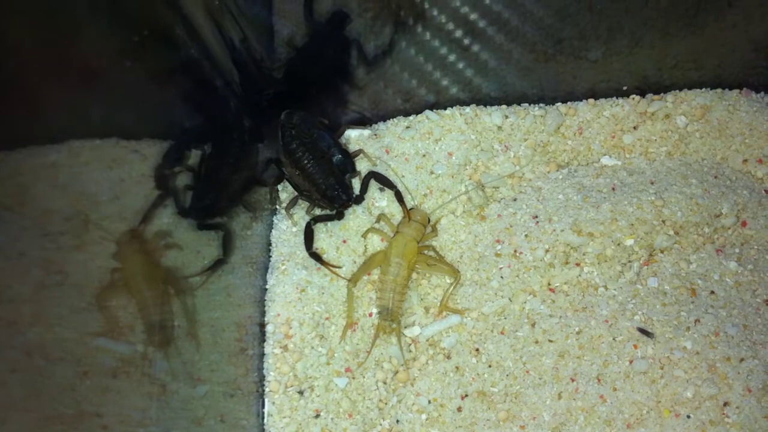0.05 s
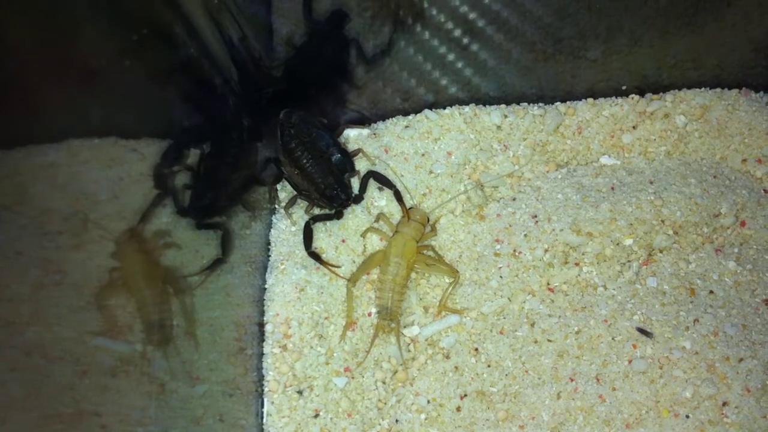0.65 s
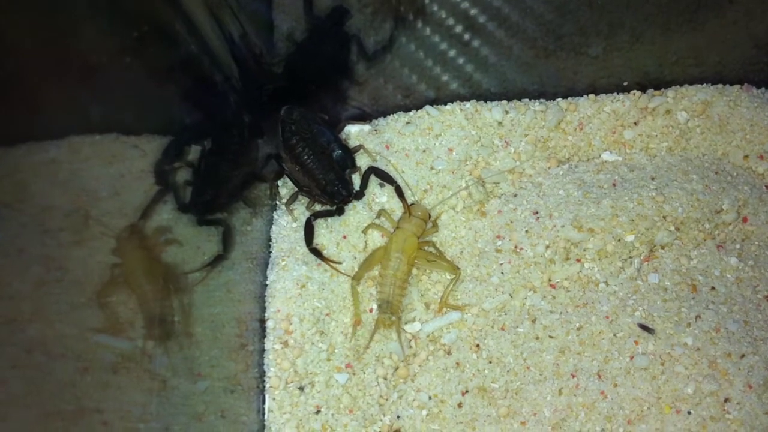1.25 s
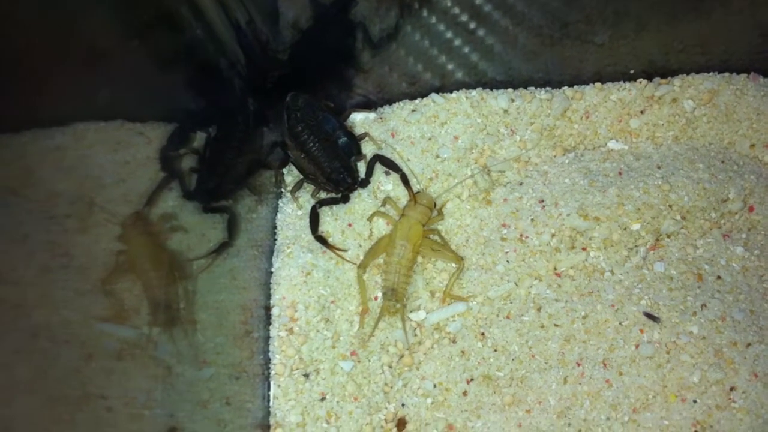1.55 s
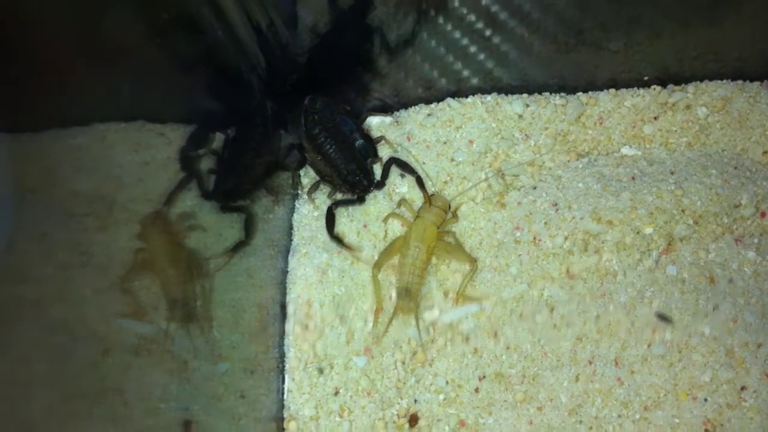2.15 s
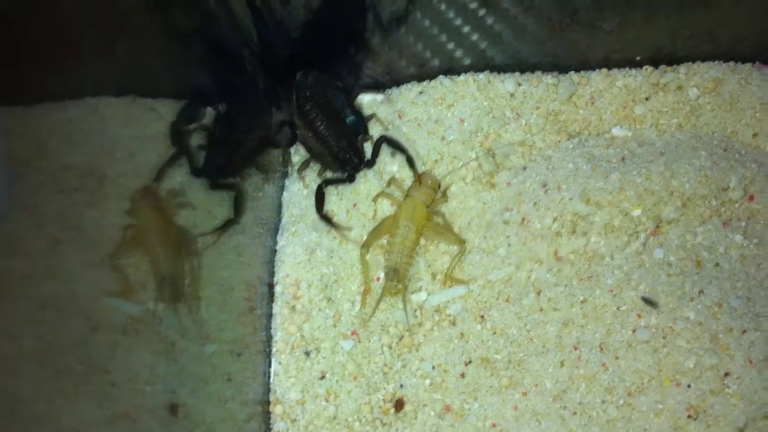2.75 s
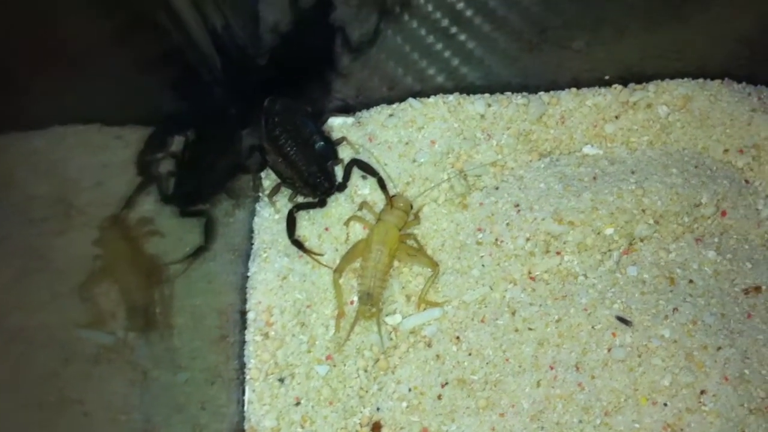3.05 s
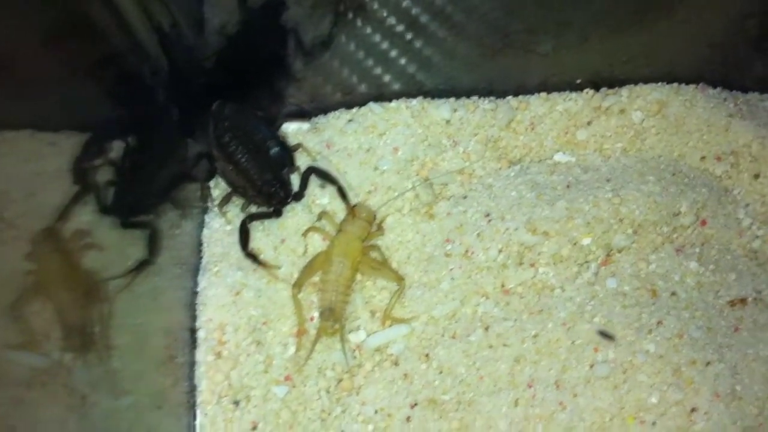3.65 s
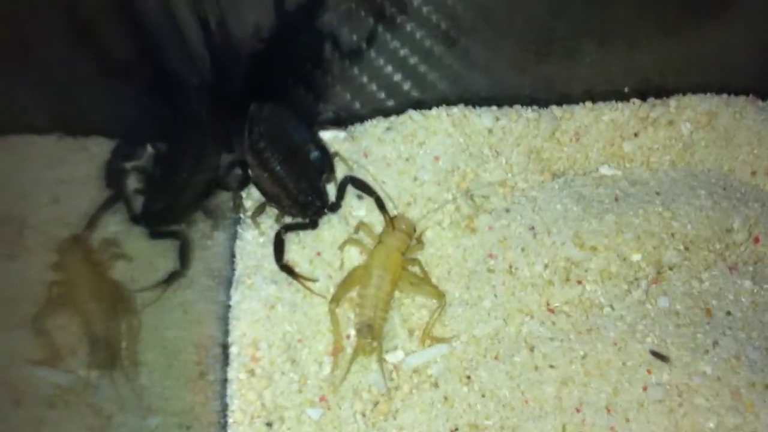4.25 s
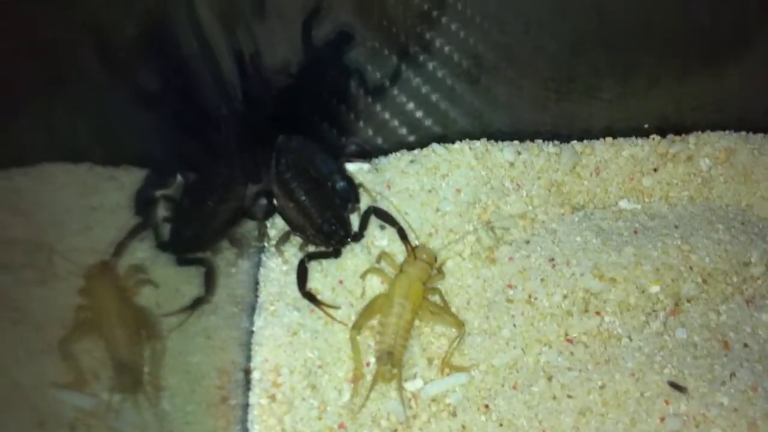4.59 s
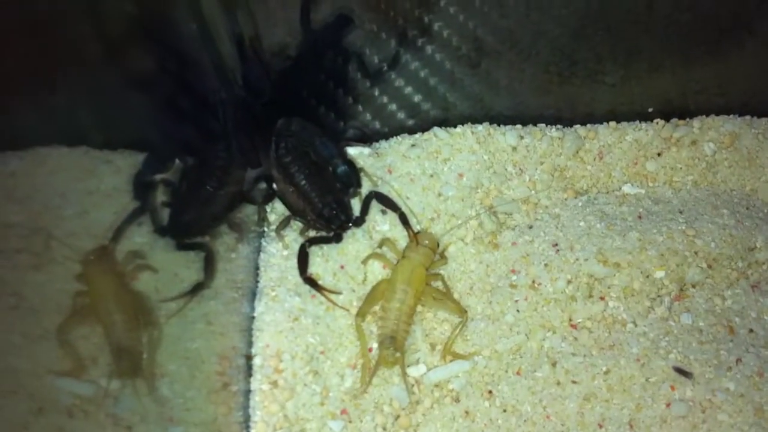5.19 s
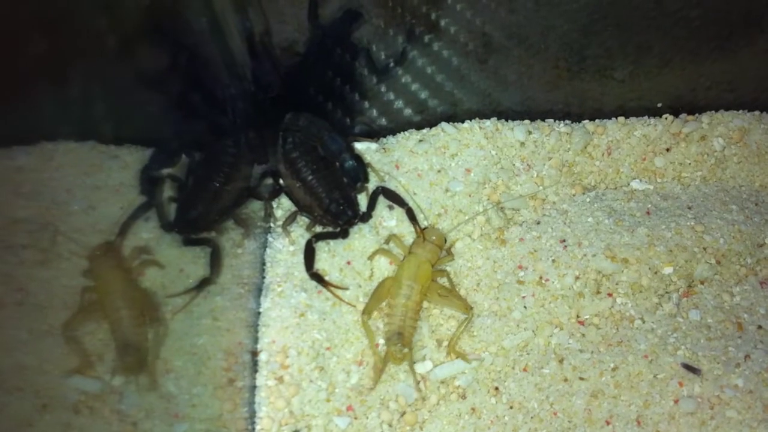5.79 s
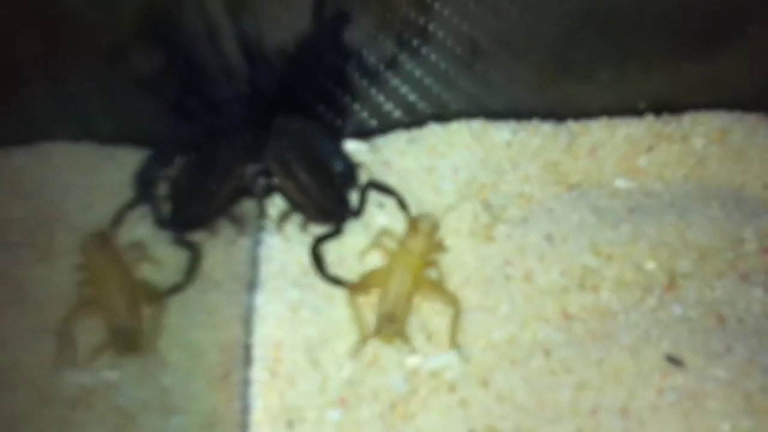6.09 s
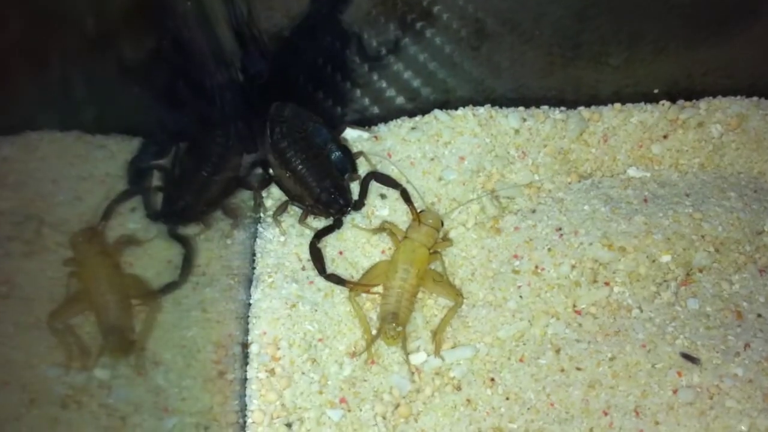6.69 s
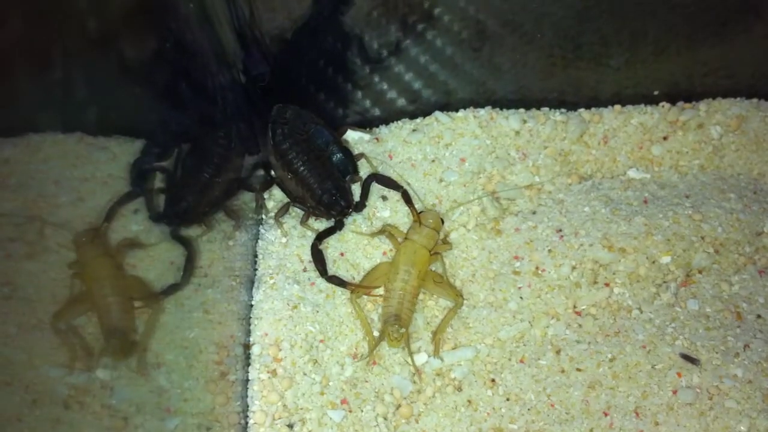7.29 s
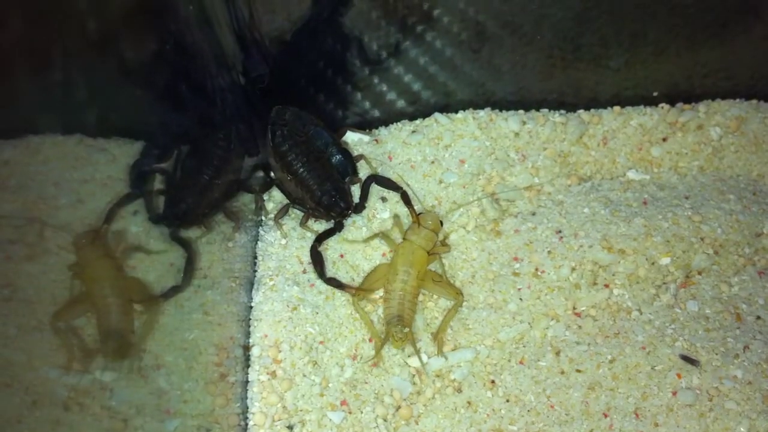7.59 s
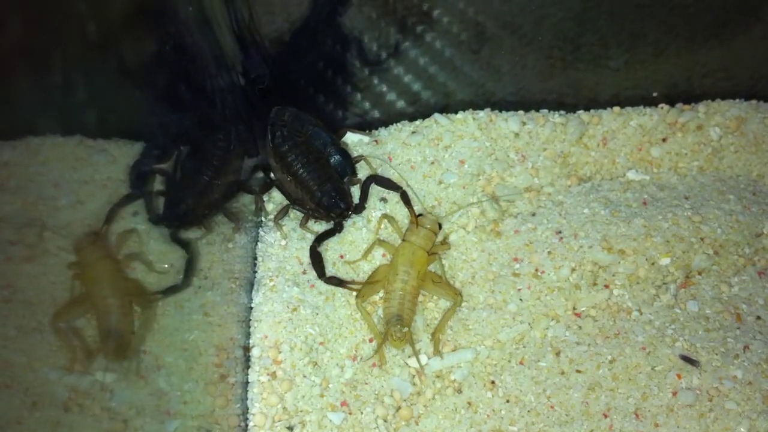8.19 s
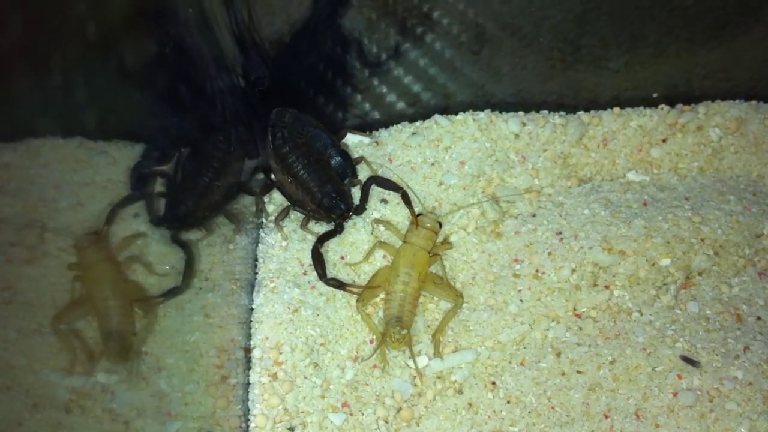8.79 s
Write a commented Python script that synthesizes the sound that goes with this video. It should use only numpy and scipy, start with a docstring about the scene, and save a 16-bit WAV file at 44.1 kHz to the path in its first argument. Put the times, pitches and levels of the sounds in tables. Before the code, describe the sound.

A hand-held camera's case clicks, thuds softly and snaps once loudly over quiet ventilation hum and hiss.

```python
"""A hand-held camera hovers over a glass animal tank in a quiet room. From the start, ventilation
rumbles and hums and the microphone hisses. The grip rubs and rustles, and a wall clock ticks faintly.
From about 1.5 s the camera's case clicks as its joints slip, and thuds as fingers push on it.
Near 6 s one snap is much louder than the rest. Then a distant motor takes up load and drones louder,
and at the end a low draught swells."""
import sys
import numpy as np
from scipy import signal
from scipy.fft import rfft, irfft
from scipy.io import wavfile

SR = 44100
rng = np.random.default_rng(int(sys.argv[2]) if len(sys.argv) > 2 else 0)


def store_pcm(level_fs):
    """Save levels as 16-bit WAV."""
    pcm = np.round(np.clip(level_fs, -1, 1) * 32767).astype(np.int16)
    wavfile.write(sys.argv[1], SR, np.atleast_2d(pcm).T)


N = 389844
TIME = np.arange(N) / SR
FREQUENCIES = np.fft.rfftfreq(N, 1 / SR)

# Each time a joint of the case lets go: start_s, body_db, contact_cutoff_hz, crack_db, crack_hz,
# snap_db, snap_hz, grit_db, build_up_s, die_out_s
CASE_CLICKS = [(1.5557, -48, 1500, -29, 2290, -44, 9000, -40.5, 0.0042, 0.0019),
               (1.6160, -23, 220, -29, 1920, -30, 8100, -49, 0.00054, 0.00068),
               (3.5795, -16.5, 400, -34, 900, -29, 6600, -48, 0.00053, .0005),
               (4.334, -60, 1500, -50, 3500, -44, 8000, -54, .0008, .0008),
               (4.3418, -45, 1730, -26, 1950, -31, 11000, -54, .0003, .0004),
               (4.3848, -41, 1200, -42, 1150, -42, 5000, -70, .0005, .003),
               (6.0900, -3, 2300, -27, 2100, -12, 7200, -44, 0.0004, 0.0057)]


def from_db(db):
    """Turn decibels into a number to multiply a sound by."""
    return 10 ** (np.asarray(db) / 20)


def rms_one(x):
    """Scale a sound so that its average strength (rms) is 1."""
    return x / np.sqrt(np.mean(x ** 2) + 1e-20)


def colour(spectrum):
    """Join rows of pitch_hz, level_db into a strength for every frequency."""
    hz, db = np.transpose(spectrum)
    return from_db(np.interp(np.log(FREQUENCIES + 1), np.log(hz), db))


def noise(gains):
    """Noise of strength 1, with its frequencies balanced by gains."""
    return rms_one(irfft(rfft(rng.standard_normal(N)) * gains, N))


def band_noise(hz, width_hz):
    """Noise gathered around one pitch."""
    return noise(1 / (1 + ((FREQUENCIES - hz) / width_hz) ** 2))


def ring(hz, fade_s, wave=np.sin):
    """The note of something struck: it dies away by 60 dB in fade_s."""
    t = TIME[:SR // 10]
    return wave(2 * np.pi * hz * t) * np.exp(-np.log(1000) * t / fade_s)


def low_pass(x, hz, order=1):
    """Dull a sound above hz; a higher order cuts more steeply."""
    return signal.sosfilt(signal.butter(order, hz, fs=SR, output="sos"), x)


def high_pass(x, hz):
    """Steeply cut what lies below hz."""
    return signal.sosfilt(signal.butter(4, hz, "high", fs=SR, output="sos"), x)


def swell(middle_s, half_length_s):
    """A smooth rise to 1 and fall again."""
    return np.exp(-((TIME - middle_s) / half_length_s) ** 2)


def add(out, start_s, sound):
    """Mix a short sound into out."""
    start = round(start_s * SR)
    out[start:start + len(sound)] += sound[:max(N - start, 0)]


def air(level_db=-56.5):
    """Room air rumbles and the microphone hisses, both steadily."""
    # Tone of the air and hiss: pitch_hz, relative_db
    spectrum = [(30, -27), (46, -37), (70, -14.5), (105, -18), (135, -1), (200, -0.5), (320, -6.5),
                (480, -4), (680, -14), (1000, -12), (2150, -13), (3100, -23.5), (5500, -28), (9000, -31.5),
                (16000, -32.5)]
    return from_db(level_db) * noise(colour(spectrum))


def draught(idle_db=-71.5, gust_db=-58):
    """A low draught blows softly, then swells once."""
    # Tone of the moving air: pitch_hz, relative_db
    spectrum = [(40, -37), (110, -14), (145, -1.5), (220, 6), (300, 1), (450, -2), (700, -17), (2000, -62)]
    gust = from_db(gust_db) * swell(middle_s=8.64, half_length_s=0.59)
    return (from_db(idle_db) + gust) * noise(colour(spectrum))


def fan_hum():
    """The fan hums several notes; each wavers, which blurs its pitch."""
    # The fan's notes: pitch_hz, level_db, width_hz
    notes = [(193.8, -72, 10), (286, -66, 8), (358.5, -68, 7), (727, -73, 4), (1792.5, -77.5, 4),
             (2149, -76, 3), (2864, -88, 3)]
    out = np.zeros(N)
    for hz, db, width_hz in notes:
        wander = np.cumsum(rng.standard_normal(N)) * np.sqrt(2 * np.pi * width_hz / SR)
        phase = 2 * np.pi * hz * TIME + low_pass(wander, hz=16)
        out += from_db(db) * np.sqrt(2) * np.sin(phase)
    return out


def motor_drone(pitch_hz=78.3, width_hz=13.0, idle_db=-81.5, loaded_db=-73, load_s=6.8, rise_s=0.24):
    """A distant motor throbs unevenly, and grows louder once it takes up load."""
    load = np.clip((TIME - load_s) / rise_s, 0, 1)
    drone = noise(np.exp(-((FREQUENCIES - pitch_hz) / width_hz) ** 2))
    return from_db(idle_db + load * (loaded_db - idle_db)) * drone


def scratches():
    """Light rubbing swells and fades around one pitch; the narrowest rubs squeak."""
    # Faint rubs: middle_s, level_db, half_length_s, pitch_hz, width_hz
    rubs = [(0.45, -75, 0.47, 3300, 200), (1.02, -73, .1, 2950, 200), (4.453, -62.5, 0.4, 488, 50.3),
            (5.448, -74, 0.11, 3680, 250), (7.784, -74, 0.083, 5000, 550), (8.606, -73, .010, 5000, 110),
            (8.636, -77, .012, 4980, 110)]
    return sum(from_db(db) * swell(middle_s, half_length_s) * band_noise(hz, width_hz)
               for middle_s, db, half_length_s, hz, width_hz in rubs)


def rustles(grains_per_s=6300, rise_s=0.0011, decay_s=0.015):
    """Short slips of the grip each make a dying spray of tiny grains of sound."""
    # Dry rustles: start_s, level_db, lowest_hz, highest_hz
    grip_slips = [(0.249, -56.5, 1900, 5000), (0.2600, -53.5, 1500, 2600), (0.2920, -64, 3000, 4000),
                  (0.447, -54.5, 3500, 4200), (1.241, -66.5, 6500, 13000), (2.101, -65, 6000, 12000),
                  (2.191, -60, 4500, 14000), (2.377, -67, 3500, 10000), (2.579, -65, 4500, 14000),
                  (2.647, -68, 7000, 14000), (2.812, -68, 7000, 14000), (2.944, -67, 7000, 14000),
                  (3.841, -67, 3200, 3500), (6.490, -70, 7000, 13000), (6.979, -67, 6000, 11000)]
    out, t = np.zeros(N), TIME[:SR // 10]
    for start_s, db, low_hz, high_hz in grip_slips:
        grains = rng.standard_normal(len(t)) * (rng.random(len(t)) < grains_per_s / SR)
        spray = high_pass(low_pass(low_pass(grains, high_hz), high_hz), low_hz)
        loudness = from_db(db) * (1 - np.exp(-t / rise_s)) * np.exp(-t / decay_s)
        add(out, start_s, loudness * rms_one(spray))
    return out


def clock(first_tick_s=0.290, lift_s=0.016, lift_db=-6.0, decay_s=0.014, tail_db=-0.5, tail_s=0.034):
    """Once a second a small catch lifts softly, drops, and leaves a short tail in the room."""
    # Tone of a tick: pitch_hz, relative_db
    spectrum = [(1000, -2.5), (2700, -5), (3800, -2.5), (5800, -4.5), (6800, -15), (14000, -21)]
    # Strength of each tick in turn: level_db
    tick_levels = [-71, -68, -65, -73, -64, -66, -63.5, -67, -65.5]
    beat, since_lift = np.divmod(TIME - first_tick_s + lift_s, 1)
    level = from_db(tick_levels)[beat.astype(int) % len(tick_levels)]
    since_drop = np.maximum(since_lift - lift_s, 0)
    drop = np.exp(-since_drop / decay_s) + from_db(tail_db) * np.exp(-since_drop / tail_s)
    return level * np.where(since_lift < lift_s, from_db(lift_db), drop) * noise(colour(spectrum))


def joint_slips():
    """A joint lets go: a gritty noise builds up to each click and dies after it."""
    # Tone of the grit: pitch_hz, relative_db
    spectrum = [(600, 6.5), (1500, -5), (2150, 8), (3200, -10.5), (5500, -5), (9000, -7), (12000, -14),
                (16000, -16)]
    loudness = np.zeros(N)
    for click_s, *_, grit_db, build_up_s, die_out_s in CASE_CLICKS:
        since_click = TIME - click_s
        loudness += from_db(grit_db) * np.exp(-np.maximum(-since_click / build_up_s, since_click / die_out_s))
    return loudness * noise(colour(spectrum))


def delay_lows(x, hz):
    """What lies below hz arrives a little later, as it does when waves bend a shell."""
    return 2 * low_pass(x, hz) - x


def clicks(crack_fade_s=0.0013, snap_fade_s=0.00061, chatter_db=-24.0, chatter_s=0.0035,
           chatter_hz=2620.0, echo_s=0.026, echo_db=-25.0, tail_db=-36.0, tail_s=0.018):
    """A contact cracks, snaps and rings the case; softer contacts ring only its low notes."""
    # The notes the case rings at: pitch_hz, relative_db, fade_s
    case_notes = [(173, -41, 0.031), (222, -12, 0.018), (360, -16, 0.01), (555, -14, 0.016),
                  (860, -27, 0.016), (1330, -24, 0.015), (2530, -20, .0073), (2880, -26, 0.024),
                  (3750, -12.5, 0.0047), (5560, -31, 0.0081), (7200, -44, 0.0063), (9700, -30, 0.015)]
    # Pitches where those notes cancel each other: pitch_hz, width_hz
    hollows = [(475, 45), (2090, 67)]
    out, tails, t = np.zeros(N), np.zeros(N), TIME[:SR // 10]
    ringing = sum(from_db(db) * ring(hz, fade_s, np.cos) for hz, db, fade_s in case_notes)
    ringing = delay_lows(delay_lows(ringing, hz=330.0), hz=1100.0)
    for start_s, body_db, contact_hz, crack_db, crack_hz, snap_db, snap_hz, *_ in CASE_CLICKS:
        # loose parts chatter for a few milliseconds
        rattle = rms_one(low_pass(low_pass(rng.standard_normal(len(t)), chatter_hz), chatter_hz))
        chatter = from_db(chatter_db) * rattle * np.exp(-t / chatter_s)
        body = from_db(body_db) * low_pass(ringing + chatter, contact_hz)
        crack = from_db(crack_db) * ring(crack_hz, crack_fade_s)
        snap = from_db(snap_db) * ring(snap_hz, snap_fade_s)
        add(out, start_s, body + crack + snap)
        # the room answers with one dull echo and a faint tail
        add(out, start_s + echo_s, from_db(echo_db) * low_pass(body, hz=500.0))
        add(tails, start_s, from_db(body_db + tail_db) * np.exp(-t / tail_s))
    # the shell makes every click hollower and duller
    for hz, width_hz in hollows:
        out = signal.lfilter(*signal.iirnotch(hz, hz / width_hz, fs=SR), out)
    return low_pass(out, hz=12400.0, order=2) + tails * band_noise(hz=257.0, width_hz=257.0)


def thuds(overtone_db=-21.0, scuff_db=-34.0, scuff_s=0.005, rebound_s=0.0115, rebound_db=-8.5):
    """Fingers push with a tiny scuff and the case springs back; where they press sets the pitch."""
    # Soft pushes of the grip: start_s, level_db, pitch_hz, swings_until_quiet, rise_s
    pushes = [(1.5580, -30.5, 336, 13, .0015), (1.6180, -26, 355, 8.9, 0.0011),
              (4.3850, -31.5, 504, 9.5, .001), (4.3870, -34, 800, 7.2, 0.00043),
              (4.5138, -39, 406, 9.9, .0004), (4.6255, -34.5, 394, 8.6, .00015),
              (4.7545, -40, 794, 8, .0004), (4.7795, -33.5, 275, 7.3, .002),
              (4.7805, -28.5, 545, 8.4, 0.0016), (5.0150, -38.5, 535, 12, 0.00085),
              (5.1670, -43, 880, 9, .0004), (5.2045, -39, 870, 10, .0003), (5.2560, -46, 860, 9, .0004),
              (5.314, -38, 680, 7.5, .0002), (5.3350, -40, 800, 8, .0004), (5.4460, -39.5, 490, 8.5, .0003),
              (5.5505, -29, 327, 9.8, 0.0015), (5.6070, -41, 900, 6.6, .00015),
              (5.7705, -27, 358, 7, 0.0014)]
    out, t = np.zeros(N), TIME[:SR // 10]
    for start_s, db, hz, swings, rise_s in pushes:
        overtone = from_db(overtone_db) * ring(2 * hz, fade_s=2.3 / hz)
        thud = from_db(db) * (ring(hz, swings / hz) - overtone) * (1 - np.exp(-t / rise_s))
        scuff = from_db(db + scuff_db) * rng.standard_normal(len(t)) * np.exp(-t / scuff_s)
        add(out, start_s, thud + scuff)
        add(out, start_s + rebound_s, from_db(rebound_db) * thud)
    return out


def scene():
    """The room and the handling noises at one microphone."""
    room = air() + draught() + fan_hum() + motor_drone() + clock()
    case = clicks() + joint_slips() + thuds() + rustles()
    handling = high_pass(case, hz=97.0)  # so small a case gives off no deep bass
    return (room + handling + scratches())[None, :]


def record(dry, cutoff_hz=15850):
    """The highest treble is cut off steeply."""
    return signal.sosfilt(signal.ellip(12, .1, 70, cutoff_hz, fs=SR, output="sos"), dry)


dry = scene()
out = record(dry)
store_pcm(out)
```